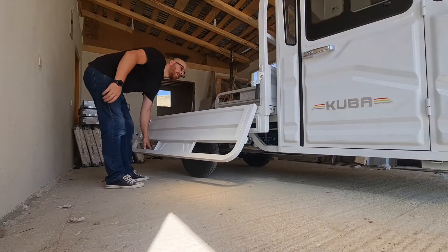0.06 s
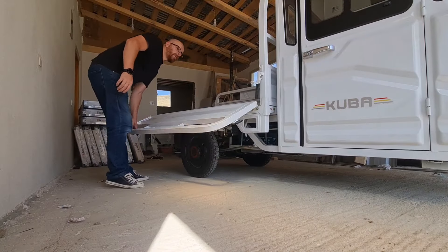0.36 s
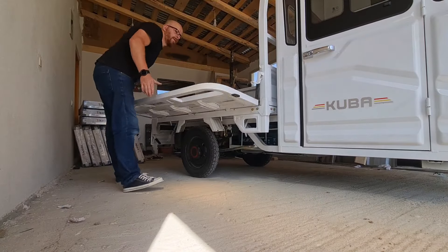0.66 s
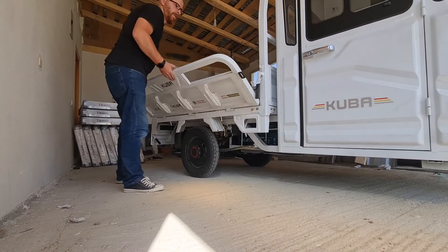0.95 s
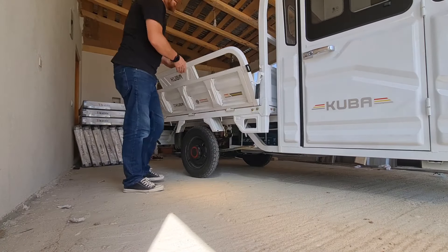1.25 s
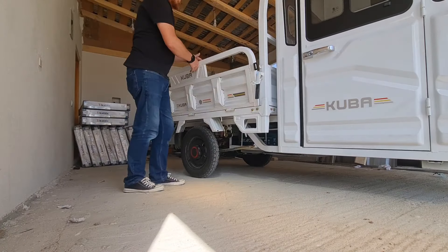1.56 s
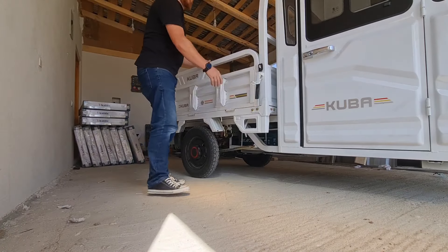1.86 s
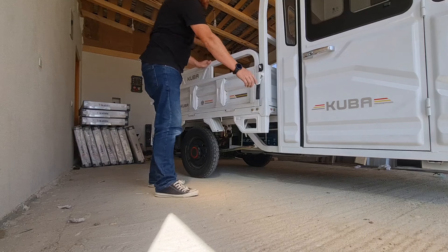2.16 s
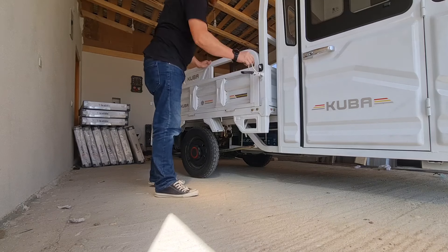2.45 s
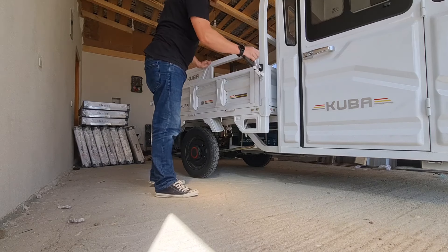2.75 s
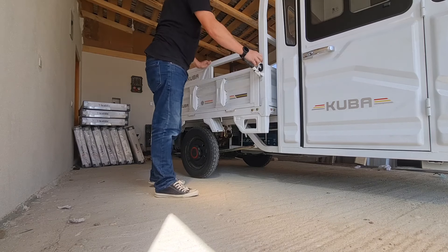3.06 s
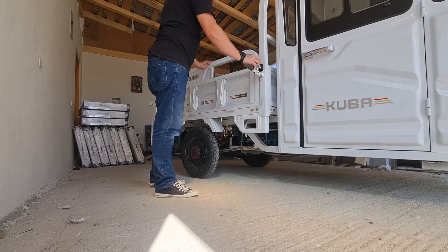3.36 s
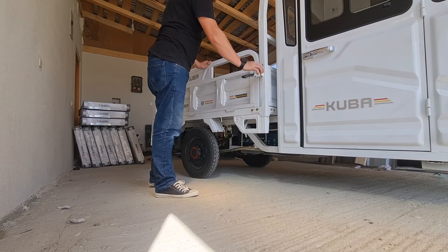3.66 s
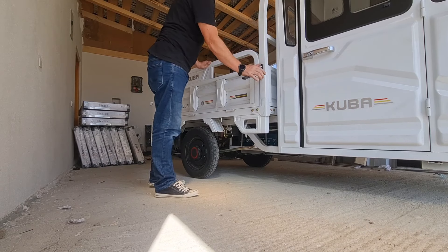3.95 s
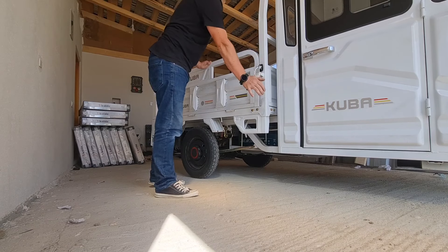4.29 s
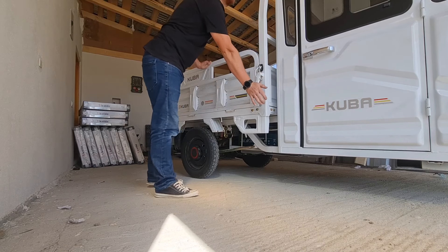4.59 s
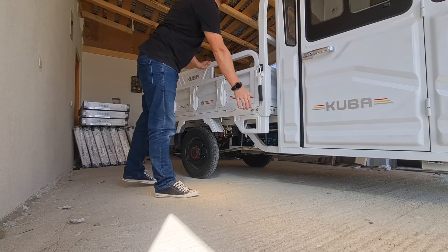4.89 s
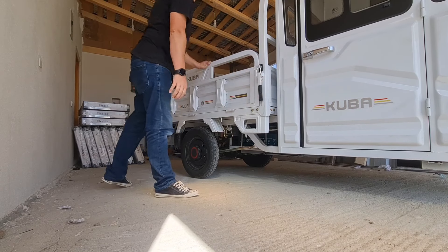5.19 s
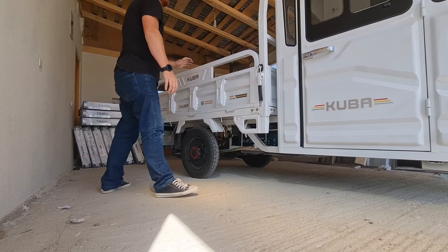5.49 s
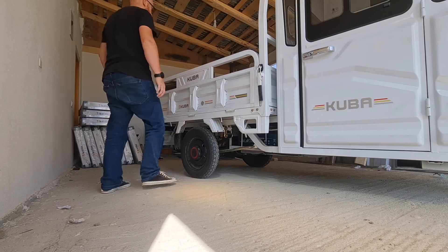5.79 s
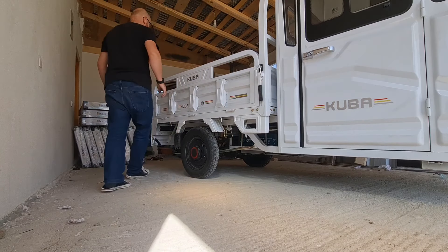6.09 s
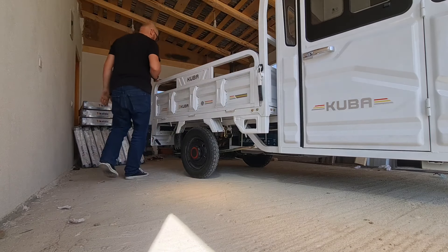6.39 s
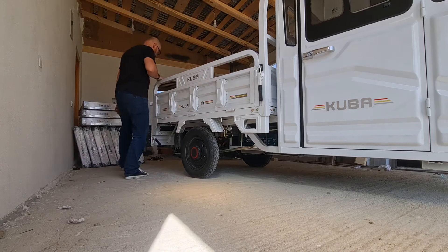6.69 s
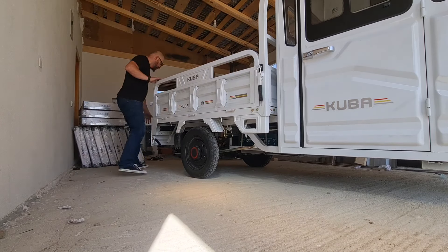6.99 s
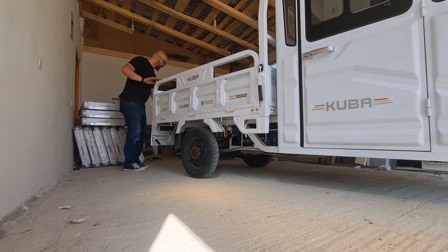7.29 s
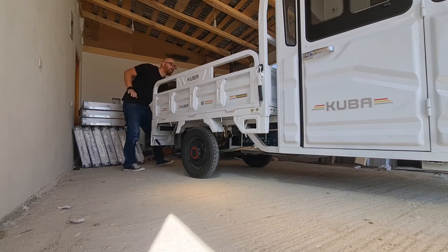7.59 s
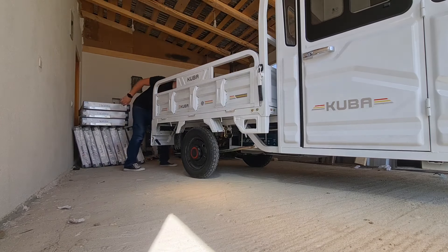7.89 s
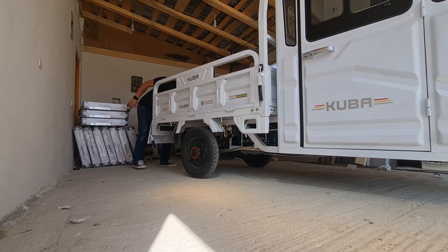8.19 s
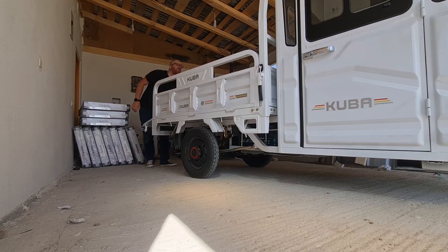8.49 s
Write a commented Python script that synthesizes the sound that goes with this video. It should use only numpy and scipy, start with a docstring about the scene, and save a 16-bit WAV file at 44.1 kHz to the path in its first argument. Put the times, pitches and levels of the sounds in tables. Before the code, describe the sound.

A small truck's steel drop gate squeals up, slams shut with a boom and is latched with bright clanks in a garage.

```python
"""Closing a truck's drop gate

A small truck's steel gate is swung up in a garage: stick-slip friction makes its hinge squeal, and it
slams against the bed, whose low modes boom on. The near latch is knocked home with bright clanks, then
the far one, whose lever squeaks as it turns. A faint hum fills the room, a draught buffets the right
microphone and the left one hisses."""
import sys
import numpy as np
from scipy import signal
from scipy.fft import rfft, irfft
from scipy.io import wavfile
from scipy.ndimage import uniform_filter1d, minimum_filter1d

SR = 44100
rng = np.random.default_rng(int(sys.argv[2]) if len(sys.argv) > 2 else 0)


def dump(signal):
    """Clip the signal to [-1, 1] and save it as 16-bit WAV at the path in sys.argv[1]."""
    limited = np.clip(np.atleast_2d(signal).T, -1, 1)
    pcm = np.round(limited * 32767).astype(np.int16)
    wavfile.write(sys.argv[1], SR, pcm)


N = 376790
CUTOFF_HZ = 15800


def from_db(db):
    """Amplitude ratio of a level in decibels."""
    return 10 ** (np.asarray(db) / 20)


def rms_one(x):
    """Normalisation to unit rms."""
    return x / np.sqrt(np.mean(x ** 2) + 1e-30)


def at_hz(points, hz):
    """Interpolation on a logarithmic frequency axis."""
    f, value = np.transpose(points)
    return np.interp(np.log(np.maximum(hz, 1)), np.log(f), value)


def bins(size):
    """Frequencies of the Fourier transform of `size` samples."""
    return np.fft.rfftfreq(size, 1 / SR)


def drift(rate_hz):
    """Random modulation: low-passed Gaussian noise of unit rms."""
    return rms_one(irfft(rfft(rng.standard_normal(N)) / (1 + (bins(N) / rate_hz) ** 2), N))


def swells(rows):
    """Superposed Gaussian envelopes, one per row of centre_s, level_db, sigma_s."""
    t = np.arange(N) / SR
    return sum(from_db(db) * np.exp(-.5 * ((t - s) / sigma) ** 2) for s, db, sigma in rows)


def envelope(start_s, rise_s, length_s, t60_s):
    """Linear growth, then exponential decay once the drive ends after length_s."""
    age = np.arange(N) / SR - start_s
    return np.clip(age / rise_s, 0, 1) * np.exp(-np.log(1000) * np.maximum(age - length_s, 0) / t60_s)


def gate_pan(hz):
    """Interchannel level difference: the gate's treble lies to the left."""
    # direction of the gate: frequency_hz, left_minus_right_db
    level_difference = [(60, 2), (380, -1), (700, 7.5), (1300, 7.5), (2400, 12), (4400, 18.5), (8000, 20),
                        (15000, 23)]
    pair = from_db(np.outer([.5, -.5], at_hz(level_difference, hz)))
    return pair / pair.mean(axis=0)


def diffuse(size):
    """Diffuse field: a flat random stereo spectrum, most coherent at long wavelengths."""
    # likeness of left and right: frequency_hz, correlation
    coherence = [(60, 0.92), (140, 0.87), (300, 0.556), (640, 0), (1400, 0.34), (3000, 0.57), (15000, 0.55)]
    alike = at_hz(coherence, bins(size))
    mid, side = rfft(rng.standard_normal((2, size)))
    return np.sqrt((1 + alike) / 2) * mid + np.sqrt((1 - alike) / 2) * side * [[1], [-1]]


def noise(spectrum, sides=1):
    """Spectral shaping of a diffuse field into steady stereo noise of unit rms."""
    return rms_one(irfft(diffuse(N) * from_db(at_hz(spectrum, bins(N))) * sides, N))


def reverberation(size, bands=10):
    """Dense modes and reflections decay exponentially, each band at its own rate."""
    # reverberation time of gate and garage: frequency_hz, t60_s
    decay_times = [(60, 1.0), (170, 0.65), (500, 0.57), (1400, 0.33), (3000, 0.61), (5200, 0.19),
                   (13000, 0.19)]
    hz, t, field, out = bins(size), np.arange(size) / SR, diffuse(size), 0
    centres = np.geomspace(40, CUTOFF_HZ, bands)
    for centre, pick in zip(centres, np.eye(bands)):
        band = irfft(field * np.interp(hz, centres, pick), size)
        out = out + band * np.exp(-np.log(1000) * t / at_hz(decay_times, centre))
    return out


def background(room_db=-55, hiss_db=-55, waver_db=2):
    """Noise floor: room tone, a hum modulated in level and phase, and the left microphone's hiss."""
    # spectrum of the room tone: frequency_hz, relative_density_db
    room_tone = [(10, -36), (30, -16.5), (55, -5), (75, 10), (105, -5), (160, 0), (260, -14), (700, -22),
                 (1200, -38), (2100, -53), (4000, -57), (7000, -71), (16000, -58.5)]
    # partials of the hum: frequency_hz, level_db
    partials = [(75.4, -72.5), (134.6, -69.5), (188.4, -79)]
    # humps in the hiss spectrum: centre_hz, width_hz, relative_density_db
    hiss_bands = [(417, 217, -2), (887, 224, -4), (1390, 530, -14.5), (2210, 286, -4), (2632, 556, -7.5),
                  (3550, 730, -18), (4960, 410, -28.5), (6504, 900, -40.5), (10680, 650, -28),
                  (13910, 1900, -30)]
    t, hz = np.arange(N) / SR, bins(N)
    hum = sum(from_db(db + waver_db * drift(1.6)) * np.sqrt(2) * np.sin(2 * np.pi * f * t + drift(1.0))
              for f, db in partials)
    humps = sum(from_db(db) * np.exp(-2 * np.log(2) * ((hz - f) / width) ** 2)
                for f, width, db in hiss_bands)
    hiss = rms_one(irfft(rfft(rng.standard_normal(N)) * humps, N))
    return from_db(room_db) * noise(room_tone) + hum + from_db(hiss_db) * hiss * [[1], [0]]


def stick_slip(start_s, length_s, hz, sag, db, rough, lift_db, shake, flutter, jitter=0.076, flutter_db=6):
    """Stick-slip oscillation of dry steel: a sagging tone whose pitch and level shake with uneven grip."""
    # 2nd, 3rd and 4th harmonics: relative_level_db
    overtones = [-18, -42, -55]
    pitch = hz - sag * np.clip(np.arange(N) / SR - start_s, 0, length_s)
    phase = 2 * np.pi * np.cumsum(pitch * (1 + jitter * rough * shake)) / SR
    upper = sum(from_db(level + lift_db) * np.sin(k * phase) for k, level in enumerate(overtones, 2))
    swell = envelope(start_s, rise_s=0.047, length_s=length_s, t60_s=0.22)
    return np.sqrt(2) * (np.sin(phase) + upper) * from_db(db + flutter_db * rough * flutter) * swell


def squeals(room_db=-7, size=32768):
    """Friction tones of hinge and latch lever arrive as direct sound plus wall reflections."""
    # hinge, later lever: start_s, length_s, pitch_hz, sag_hz_per_s, level_db, roughness, overtone_lift_db
    slips = [(0, .085, 1864, 99, -26, .03, -5.5), (0.011, .065, 2635, 100, -43.5, 0.06, 0),
             (.075, 0.059, 2595, 1500, -43.5, .45, 2), (0.096, 0.095, 2436, 148, -39, .1, 1),
             (0.128, 0.069, 2070, 300, -48.5, .5, 7), (0.245, 0.089, 2452, 100, -58, .08, -16),
             (8.217, 0.079, 2022, 60, -40.5, .15, 10.5), (8.302, 0.089, 2060, 60, -40, .18, 4),
             (8.363, 0.065, 2057, 60, -31.5, 0.05, -21), (8.404, .055, 1907, 400, -44.5, .35, 6),
             (8.45, 0.073, 1890, 1700, -37.5, .24, 2)]
    shake, flutter = drift(400), drift(110)
    direct = sum(stick_slip(*row, shake, flutter) for row in slips)
    walls = rms_one(reverberation(size)) / np.sqrt(size)
    reflected = signal.fftconvolve(direct[None], walls, axes=1)[:, :N]
    return gate_pan([2000]) * (direct + from_db(room_db) * reflected)


def swing(judder_db=2):
    """Flexural vibration makes the moving panel rumble; its hinges add uneven friction noise."""
    # the handled panel flexes: centre_s, level_db, sigma_s
    flexes = [(.27, -57, .04), (.5, -48.5, 0.046), (.596, -36, 0.022), (.73, -50, 0.048), (1.7, -53.5, .08),
              (2.08, -50.5, 0.14), (2.55, -48.5, 0.37), (8.5, -53.5, 0.082)]
    # spectrum of the flexing panel: frequency_hz, relative_density_db
    panel_spectrum = [(10, -52.5), (35, -14), (75, 11), (110, -1), (160, 8.5), (230, -26.5), (500, -26),
                      (1500, -72)]
    # dry steel rubs on steel: centre_s, level_db, sigma_s
    rubs = [(.07, -52, 0.069), (.24, -47, 0.057), (.55, -55.5, 0.13), (2.47, -54.5, 0.1),
            (4.24, -61.5, 0.074), (8.283, -40.5, 0.016), (8.5, -43, .03)]
    # spectrum of the rubbing: frequency_hz, relative_density_db
    rub_spectrum = [(150, -28), (400, 0.5), (720, 13), (1200, -2.5), (2000, -8), (4000, -15.5),
                    (8000, -73.5)]
    rumble = swells(flexes) * noise(panel_spectrum)
    friction = swells(rubs) * from_db(judder_db * drift(39)) * noise(rub_spectrum, gate_pan(bins(N)))
    return rumble + friction


def ringing(modes, starts, strike_db, scatter_db=1.5):
    """Modal synthesis: each blow excites damped resonators with scattered strength and random sign."""
    out = np.zeros((2, N))
    for hz, db, t60 in modes:
        scatter, sign = rng.standard_normal((len(starts), 2)).T
        impulses = np.full(N, 1e-18)
        impulses[starts] = from_db(strike_db + db + scatter_db * scatter) * np.sign(sign)
        force = signal.sosfilt(signal.butter(2, min(2 * hz, CUTOFF_HZ), fs=SR, output="sos"), impulses)
        r, w = np.exp(-np.log(1000) / (t60 * SR)), 2 * np.pi * hz / SR   # pole radius and angle
        out += gate_pan([hz]) * signal.lfilter([0, np.sin(w)], [1, -2 * r * np.cos(w), r * r], force)
    return out


def impact(boom_db, edge_db, tick_db, favoured_hz, favour_db, crack, favour_octaves=0.3,
           crack_s=0.0045, late_share=0.32, build_s=0.013, ripple_db=4.5, touch_s=0.001, size=49152):
    """Impulse response of the struck gate in the garage: a crack, then a wash of crowded modes."""
    # spectrum of the struck gate, with the microphone's colour in the top treble:
    # frequency_hz, relative_density_db
    struck_spectrum = [(10, -41), (40, -20.5), (70, -0.5), (160, -0.5), (300, 0.5), (550, 2), (1400, -3),
                       (2000, -4.5), (2600, -10.5), (3500, -6.5), (4200, -12.5), (5100, -26), (7500, -29.5),
                       (9500, -40.5), (12500, -24.5), (15500, -33.5)]
    hz, t = bins(size), np.arange(size) / SR
    # light contacts are thin in the low middle, hard ones have edge and tick: frequency_hz, gain_db
    contact = [(185, boom_db), (280, min(boom_db, 0)), (450, 0.25 * min(boom_db, 0)), (750, 0.01),
               (1400, 0.0016), (3200, edge_db), (5500, edge_db), (11000, tick_db)]
    # the struck spot favours one group of modes, and the others unevenly
    favour = favour_db * np.exp(-(np.log2((hz + 1) / favoured_hz) / favour_octaves) ** 2)
    ripple = np.interp(hz, np.geomspace(400, CUTOFF_HZ, 160), rng.standard_normal(160))
    excitation = from_db(at_hz(contact, hz) + favour + ripple_db * ripple * hz / (hz + 600))
    colour = rms_one(from_db(at_hz(struck_spectrum, hz))) * excitation
    # minimum phase: the steel sounds only after it is touched
    cepstrum = irfft(np.log(colour + 1e-9), size)
    causal = colour * np.exp(1j * rfft(2 * cepstrum[:size // 2], size).imag)
    snap = rfft(irfft(diffuse(size), size) * np.exp(-t / crack_s)) * crack * hz / (hz + 700)
    # reflections take a moment to fill the garage
    wash = rfft(reverberation(size) * (1 - late_share * np.exp(-t / build_s)))
    fades = np.minimum(1, t / touch_s) * np.minimum(1, 10 * (t[-1] - t))
    return irfft((wash + snap) * causal * gate_pan(hz), size) * fades


def strikes(start_s, db, boom_db, edge_db, favoured_hz, favour_db, frame_db, latch_db, tick_db, crack,
            bed_db=-2):
    """Impacts leave bed, frame and latch in free vibration; tick_db is relative to edge_db."""
    # low modes of the cargo bed: frequency_hz, level_db, t60_s
    bed_modes = [(64.6, -25.5, 1.8), (126.46, -11.5, 0.93), (165, -14, 0.63), (215.2, -13, 0.56)]
    # modes of the gate's tube frame: frequency_hz, level_db, t60_s
    frame_modes = [(430, -20.5, 1.3), (515.4, -12, 0.84), (614, -29.5, 1.05), (687, -26, 2.1),
                   (730.5, -25.5, 0.24), (817, -8, .55), (944, -19, 0.79), (1040, -11.5, 0.39),
                   (1236, -5, .45), (1320, -7.5, 0.28), (1452, -12, 0.27), (1703, -35, 1.7),
                   (1943, -24, 0.39), (1970, -36.5, 1.7), (2955, -29, 0.18)]
    # modes of the latch handle: frequency_hz, level_db, t60_s
    latch_modes = [(895, -12, 0.36), (1228, -22, 1.33), (1280, -13.5, 1.17), (1413, -5.5, 0.32),
                   (1445, -9.5, 0.19), (2035, -16.5, 0.45), (2320, -20.5, 0.52), (3320, -27.5, 0.36),
                   (3530, -27.5, 0.26), (1870, -24, 0.45)]
    starts = np.round(start_s * SR).astype(int)
    out = ringing(bed_modes, starts, db + boom_db + bed_db)
    out += ringing(frame_modes, starts, db + frame_db)
    out += ringing(latch_modes, starts, db + latch_db)
    for start, level, boom, edge, hz, lift in zip(starts, db, boom_db, edge_db, favoured_hz, favour_db):
        sound = from_db(level) * impact(boom, edge, edge + tick_db, hz, lift, crack)[:, :N - start]
        out[:, start:start + sound.shape[1]] += sound
    return out


def panel_knocks():
    """Impact excitation: the panel meets the bed in dull slams and knocks."""
    # panel on bed: start_s, level_db, boom_db, edge_db, favoured_hz, favour_db
    knocks = [(0.717, -53.5, 10, -18.5, 850, 1), (0.773, -55.5, -3.5, -2.5, 820, -4),
              (0.942, -25, 16, -21.5, 686, 14), (1.027, -16.5, 9, -13, 1194, 12.5),
              (1.055, -24.5, 14, -10, 730, 19), (1.114, -22.5, 15, -38, 730, 10.5),
              (1.121, -30.5, 13, -24, 1215, 15), (1.303, -42.5, 31.5, -18, 740, 4.5),
              (1.373, -55.5, 30, -30, 501, 21.5), (1.511, -39, 5.5, -13.5, 830, 3),
              (1.989, -52.5, -2.5, -7, 794, 13), (2.059, -60.5, -1, -13, 850, 13.5),
              (3.565, -32, -10.5, -17.5, 620, 7), (3.664, -26.5, -10.5, -14, 1510, 3),
              (3.693, -29.5, 0, -21.5, 560, 6), (6.947, -43.5, 6, -12, 1040, 9),
              (7.284, -50.5, 1, -15, 695, 9.5), (7.352, -51, 4, -1, 1120, 10.5),
              (7.786, -53.5, 15.5, -28, 503, 4)]
    return strikes(*np.transpose(knocks), frame_db=-9, latch_db=-18.5, tick_db=-15.5, crack=1.5)


def latch_clanks():
    """Hard contact of bare steel on steel excites the high modes in bright clanks."""
    # a latch snaps: start_s, level_db, boom_db, edge_db, favoured_hz, favour_db, frame_db, latch_db
    clanks = [(3.080, -20.5, -26, 3.5, 1020, 8, -14, 0), (3.108, -28.5, 6.5, -12, 1440, 19, -9.5, 8),
              (4.751, -14.5, -4, -2, 1402, 4, -3, -18.5), (8.157, -23, -17, -12, 284, 11, -11.5, -6.5)]
    return strikes(*np.transpose(clanks), tick_db=3, crack=1.2)


def draught(puff_sigma_s=0.017, eddy_db=4, eddy_hz=14, sheltered_db=-20):
    """Turbulent pressure: eddies thump on the right microphone port; the left one is sheltered."""
    # the strongest puffs: centre_s, level_db
    puffs = [(2.913, -32), (6.591, -22.5), (6.722, -34.5), (6.842, -25.5), (6.936, -42), (7.099, -41),
             (7.233, -35)]
    # the gust that brings most of them: centre_s, level_db, sigma_s
    gust = [(6.9, -35, 0.23)]
    # spectrum of the turbulence: frequency_hz, relative_density_db
    turbulence = [(10, -12.5), (25, 3), (45, -2), (80, 1), (140, -8), (220, -20.5), (400, -40), (1000, -88)]
    flow = swells(gust) * from_db(eddy_db * drift(eddy_hz))
    flow += swells([(s, db, puff_sigma_s) for s, db in puffs])
    return flow * noise(turbulence) * [[from_db(sheltered_db)], [1]]


def shudder(rise_s=0.039, t60_s=1.44):
    """Damped vibration: the truck rocks on its springs with a deep rumble when the latch is forced."""
    # jolts of the chassis: start_s, level_db
    jolts = [(3.101, -34.5), (3.72, -43)]
    # spectrum of the chassis: frequency_hz, relative_density_db
    chassis = [(10, -31), (30, -14.5), (62, 6), (85, -5.5), (160, -37), (400, -72)]
    return sum(from_db(db) * envelope(s, rise_s, rise_s, t60_s) for s, db in jolts) * noise(chassis)


def scene():
    """Linear superposition of all sources in the garage."""
    return panel_knocks() + latch_clanks() + squeals() + swing() + shudder() + draught() + background()


def record(dry, ceiling=.92, fade_in_s=.005):
    """Peak limiting with a smoothed gain, then band limiting by a steep low-pass filter."""
    gain = np.minimum(1, ceiling / (abs(dry).max(axis=0) + 1e-9))
    held = minimum_filter1d(gain, size=401)
    smoothed = uniform_filter1d(uniform_filter1d(held, size=201), size=201)
    fade = np.minimum(1, np.arange(N) / SR / fade_in_s)
    low_pass = signal.ellip(10, .1, 80, CUTOFF_HZ, fs=SR, output="sos")
    return signal.sosfilt(low_pass, smoothed * fade * dry)


dry = scene()
out = record(dry)
dump(out)
```